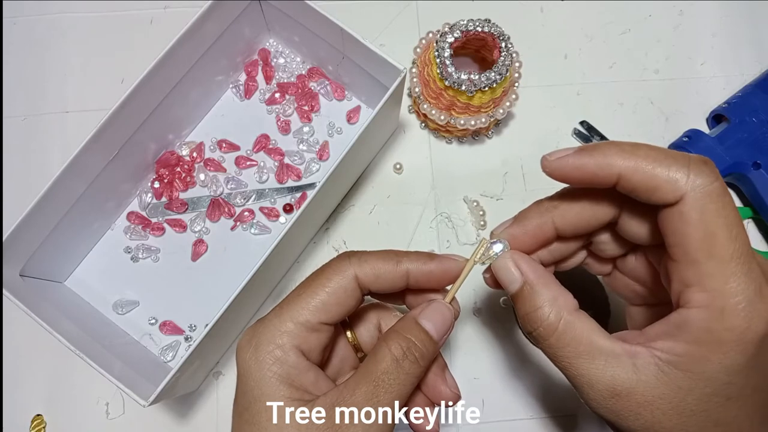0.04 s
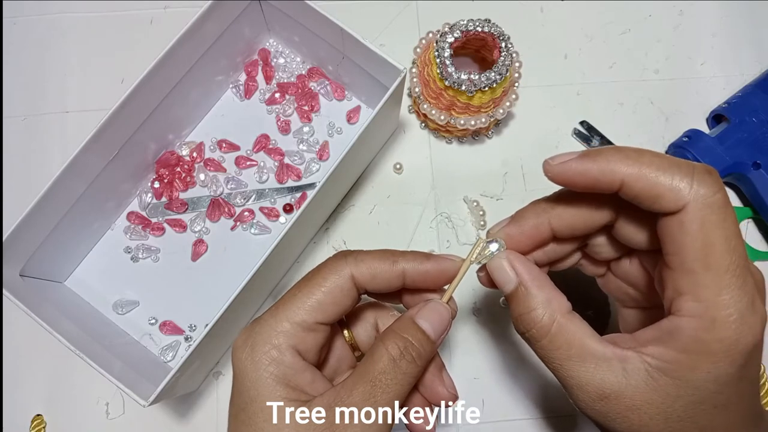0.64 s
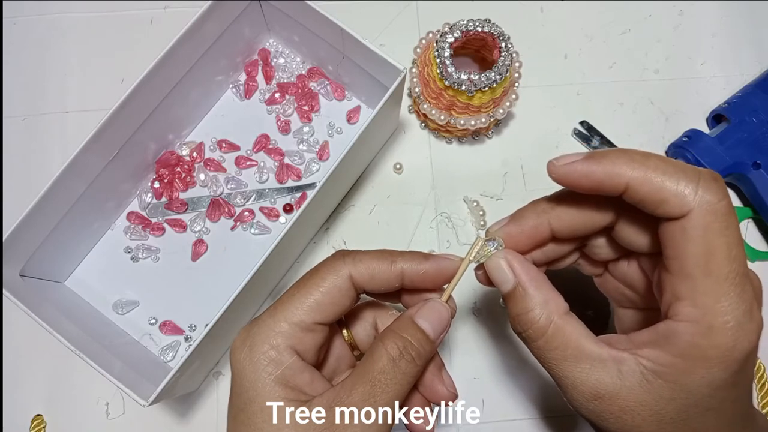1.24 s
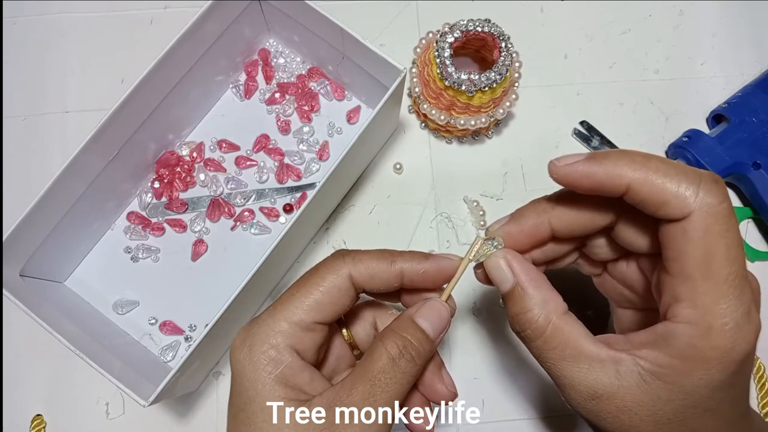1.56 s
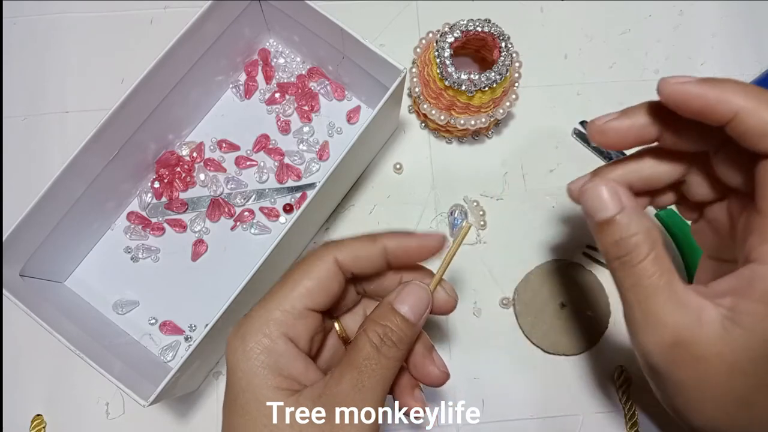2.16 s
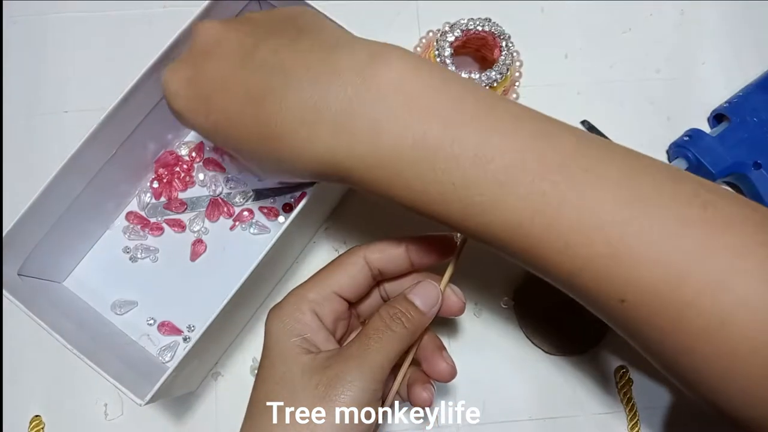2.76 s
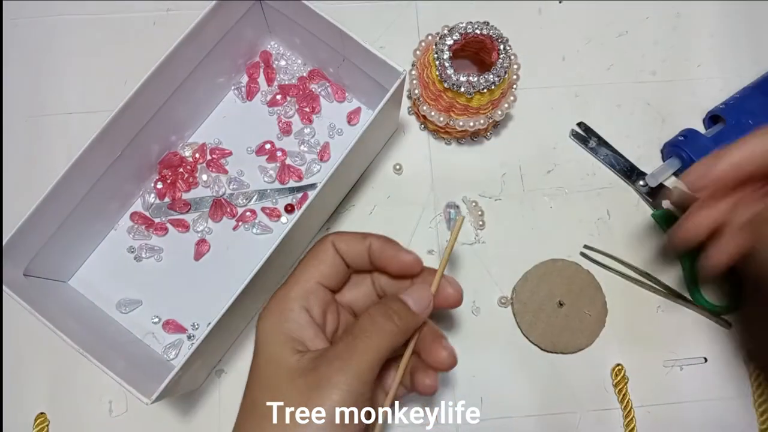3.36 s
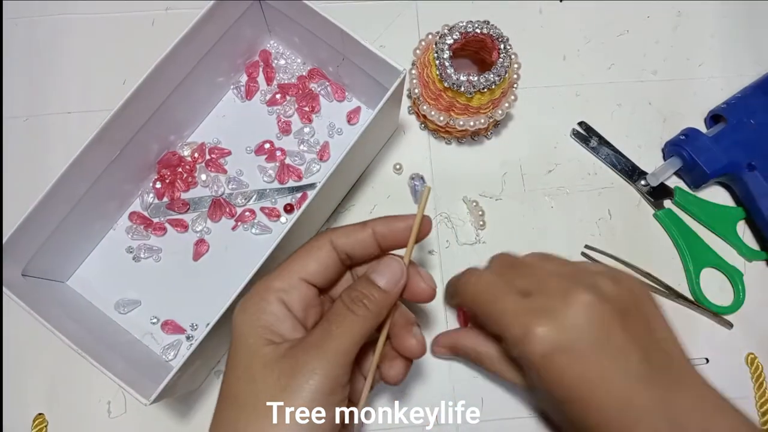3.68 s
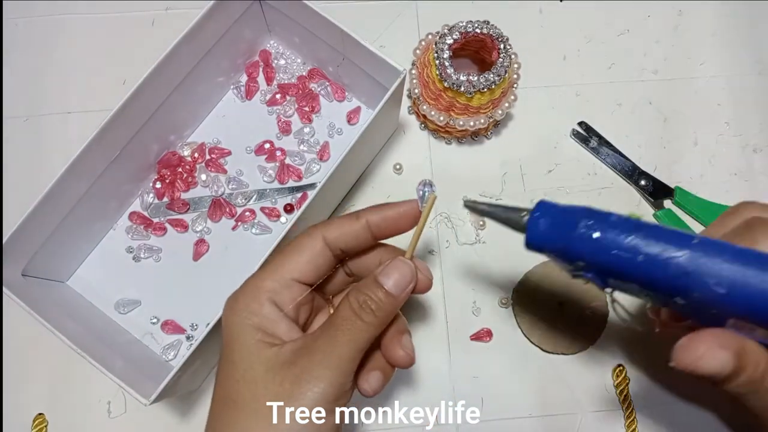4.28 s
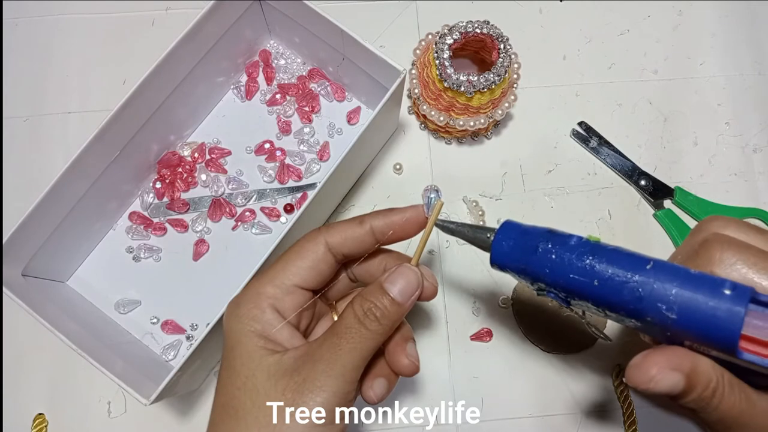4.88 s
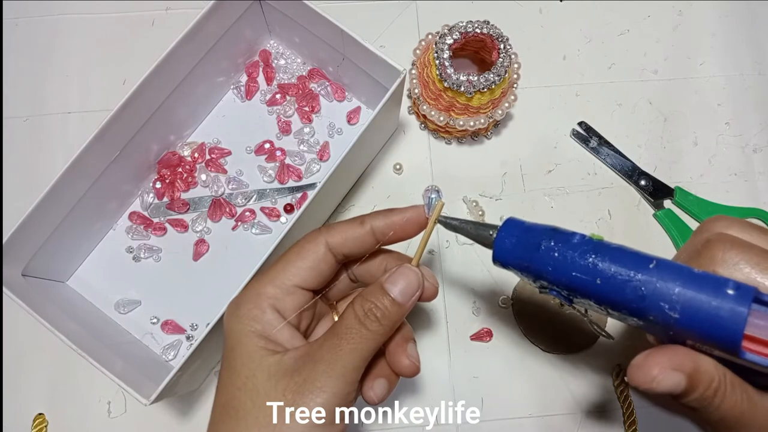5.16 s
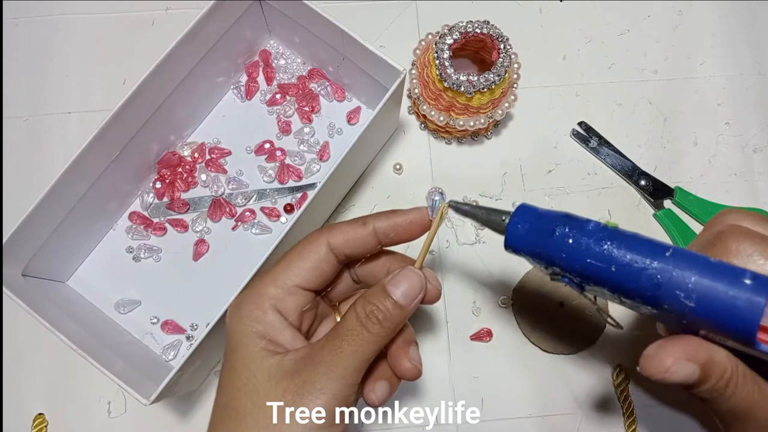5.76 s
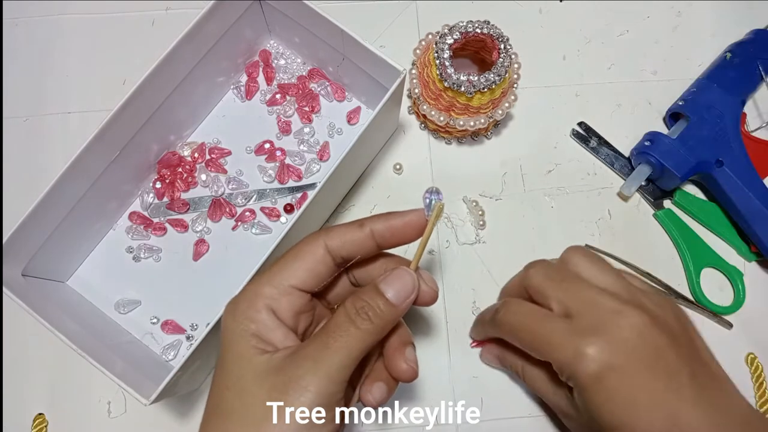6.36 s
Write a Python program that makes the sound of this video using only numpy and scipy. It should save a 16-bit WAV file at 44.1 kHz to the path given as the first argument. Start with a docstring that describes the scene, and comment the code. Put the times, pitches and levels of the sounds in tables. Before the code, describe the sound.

Over a steady low room hum, soft finger friction and small ticks of beads and tools are heard up close. Low puffs of air hit the microphone through the middle, with a couple of pops. A glue gun is squeezed in a run of light clicks and tiny rasps, then lands on its stand with a sharp plastic knock near the end.

```python
"""Fingers fiddle with beads and tools on a table, close to a small microphone in a quiet, humming room.
Taps and sliding friction ring the small objects. A draught buffets the microphone port in low puffs.
A glue gun is picked up: trigger clicks and rasps of the feed ring its housing.
It is set down with a plastic knock, the hollow shell rattling on its stand."""
import sys
import numpy as np
from scipy import signal
from scipy.fft import rfft, irfft
from scipy.io import wavfile

SR = 44100
rng = np.random.default_rng(int(sys.argv[2]) if len(sys.argv) > 2 else 0)


def unload_audio(sound):
    """Save the sound as a 16-bit wav file, at the path given as the first command line argument."""
    columns = np.transpose(np.atleast_2d(sound))
    # keep every value between -1 and 1, then stretch to whole-number steps
    steps = np.round(np.clip(columns, -1, 1) * 32767)
    wavfile.write(sys.argv[1], SR, steps.astype(np.int16))


N = 283122

# Room decay. Each row: frequency in Hz, t60 in seconds.
ROOM_T60 = [(200, 0.36), (2500, 0.1), (8000, 0.22), (15000, 0.062)]
# Spectra of the noise beds and contacts. Each row: frequency in Hz, relative density in dB.
AIR_SPECTRUM = [(15, -58.5), (25, -32), (64, -16.5), (85, -5), (108, -2.5), (194, -4.5), (224, -10.5),
                (277, -12), (444, -14), (1110, -22.5), (1340, -27), (3530, -30), (7000, -62.5), (9100, -80),
                (15400, -120)]
HISS_SPECTRUM = [(1000, -14.5), (4500, -5), (6500, -7), (8200, -10.5), (9700, -1.5), (11000, -14.5),
                 (12500, -9), (15000, -20), (16000, -46.5)]
SKIN_SPECTRUM = [(40, -26.5), (300, -12.5), (1400, -9), (2300, 6), (3800, -1), (5000, -11), (6500, -16),
                 (8200, -12.5), (9700, -3), (11500, -14), (12600, -18.5), (16000, -26)]
TAP_SPECTRUM = [(40, -31), (200, -10), (700, -8), (1400, -16), (2000, -2.5), (2700, -1.5), (3400, -1.5),
                (4200, -11.5), (5200, -17), (7500, -25.5), (9700, -15), (12500, -32.5), (16000, -28)]
RUB_SPECTRUM = [(40, -35), (300, 7), (1400, -3), (2200, 4.5), (2900, 5), (3900, 1), (5000, -10),
                (6500, -18.5), (8200, -16), (9800, -9), (12500, -26.5), (16000, -24)]
HOUSING_SPECTRUM = [(40, -36), (300, -3), (1500, -12), (2400, 3), (3000, -2.5), (3800, 4.5), (5200, -14.5),
                    (6600, -12.5), (7600, -19), (9800, -4), (11800, -15.5), (12600, -20), (14200, -14.5),
                    (16000, -23)]
CRACK_SPECTRUM = [(50, -21), (400, 5), (1500, -4), (3200, 0), (4500, -1), (6300, -12), (9300, -2.5),
                  (12500, -22), (14500, -13), (16000, -33)]
# Constant soft sliding of skin. Each row: time in seconds, relative level in dB.
SKIN_LEVELS = [(0, -65), (.4, -66.5), (.6, -65.5), (.85, -63), (1.0, -69), (1.3, -66), (1.7, -70.5),
               (2.1, -70), (2.3, -68), (2.7, -65.5), (2.95, -70.5), (3.55, -69), (3.85, -65), (4.35, -63),
               (4.6, -65.5), (5.05, -69), (5.6, -66), (6.42, -69)]
# Dull bumps and scuffs. Each row: time in seconds, level in dB, length in seconds, centre and width in Hz.
DULL_BUMPS = [(0.123, -41, 0.027, 154, 111), (0.132, -47, 0.04, 617, 553), (0.283, -51, 0.016, 1050, 240),
              (0.429, -48.5, 0.063, 620, 260), (0.687, -51, 0.016, 720, 706), (2.326, -50, 0.081, 564, 150),
              (5.194, -47, 0.0047, 1710, 1400), (5.67, -56, 0.019, 1110, 160)]
# Beads and tools touching. Each row: start in seconds, body level in dB, resonance in Hz.
BEAD_TAPS = [(0.2406, -49.5, 2580), (2.2679, -47, 2870), (2.5505, -46, 2600), (2.9153, -46.5, 2110),
             (2.9503, -43.5, 2560), (3.0457, -54.5, 2060), (3.238, -49, 2350), (3.7828, -47.5, 3510),
             (3.834, -36.5, 3900), (4.0115, -47.5, 2270), (4.0769, -36, 2640), (4.091, -45.5, 3480),
             (4.3051, -54.5, 1860), (6.2226, -40, 2460)]
# Finger strokes. Each row: centre in seconds, relative level in dB, length in seconds, resonance in Hz.
FINGER_RUBS = [(0.248, -50, 0.013, 2640), (0.347, -70, .007, 3670), (0.424, -57, 0.05, 2290),
               (0.514, -58.5, 0.039, 2660), (0.577, -58, 0.039, 2350), (0.644, -52, .016, 3500),
               (0.686, -57, .03, 2480), (0.777, -51, 0.019, 3470), (0.842, -56, 0.021, 3810),
               (0.944, -56, 0.013, 2720), (1.067, -67, 0.014, 2490), (1.255, -58, 0.031, 2570),
               (1.44, -66, 0.018, 3160), (1.615, -54.5, .02, 3440), (1.781, -57.5, 0.022, 3700),
               (1.846, -58.5, 0.03, 2280), (2.008, -61, 0.018, 3770), (2.234, -57, .022, 2300),
               (2.276, -47, 0.023, 2650), (2.556, -44, .017, 2480), (2.685, -70, 0.01, 3660),
               (2.88, -58.5, .15, 2200), (2.961, -57.5, 0.038, 2500), (3.41, -55.5, 0.011, 3150),
               (3.612, -57.5, .025, 3570), (3.845, -53, 0.038, 3870), (4.012, -47.5, 0.013, 2900),
               (4.079, -57, .017, 2700), (4.334, -57.5, 0.013, 3980), (4.464, -61, .05, 3900),
               (5.026, -48, 0.031, 2800), (5.817, -46, 0.015, 2750), (6.157, -51, 0.023, 3070),
               (6.236, -42, .025, 2480), (6.41, -51, 0.015, 3470)]
# Wind strength, one curve per gust. Each row of a curve: time in seconds, relative level in dB.
GUST_CURVES = [
    [(2.19, -62), (2.212, -31.5), (2.228, -18), (2.256, -27.5), (2.28, -18), (2.358, -40), (2.386, -24.5),
     (2.406, -34.5), (2.484, -23.5), (2.512, -31), (2.556, -51), (2.58, -48)],
    [(2.72, -43.5), (2.77, -17.5), (2.782, -18.5), (2.796, -30), (2.832, -27), (2.862, -14.5), (2.894, -23),
     (2.922, -16), (2.948, -31), (2.97, -16.5), (2.992, -19.5), (3.03, -53)],
    [(3.03, -44), (3.062, -33), (3.076, -36), (3.09, -48)],
    [(3.09, -47), (3.128, -29), (3.174, -15), (3.216, -24), (3.244, -14.5), (3.266, -26), (3.298, -18.5),
     (3.346, -48), (3.35, -39)],
    [(3.35, -38), (3.378, -21.5), (3.394, -17), (3.41, -19), (3.434, -43.5), (3.464, -34), (3.492, -55),
     (3.5, -64)],
    [(3.89, -58), (3.906, -32), (3.928, -26.5), (3.988, -30.5), (4.0, -33), (4.02, -64)],
    [(4.45, -68), (4.462, -42.5), (4.478, -20.5), (4.494, -21.5), (4.55, -62)],
    [(4.6, -52), (4.614, -47), (4.684, -33.5), (4.736, -64), (4.754, -40.5), (4.802, -28), (4.856, -46),
     (4.87, -57)],
    [(4.97, -64), (4.98, -48), (4.996, -22.5), (5.01, -25.5), (5.098, -42), (5.12, -47)],
]
# Upper edge of the rumble in Hz at the reference strength, one per gust.
GUST_EDGES_HZ = [199, 233, 200, 220, 138, 135, 215, 145, 155]
# Eddies hitting the port squarely. Each row: centre in seconds, gain in dB, half-width in seconds.
PORT_POPS = [(2.92, -12.5, 0.0013), (3.2397, -10, 0.0013)]
# Trigger clicks. Each row: start in seconds, relative level in dB, treble against body in dB.
TRIGGER_CLICKS = [(4.7028, -52.5, 3), (4.9006, -48, 0.5), (4.9558, -53, 2), (5.0054, -44, -5),
                  (5.0837, -50, 1), (5.1076, -50, 2), (5.1486, -49, 3), (5.2423, -46, 5),
                  (5.3761, -47.5, 5.5), (5.9627, -47.5, 3.5), (5.9985, -42.5, 2), (6.068, -48.5, -7.5)]
# Glue stick slipping in the feed. Each row: centre in seconds, body level in dB.
FEED_SLIPS = [(4.771, -58), (4.856, -60.5), (5.024, -56), (5.212, -54.5), (5.325, -67.5), (5.39, -55),
              (5.449, -53), (5.61, -62.5), (5.971, -49)]
# Modes of the gun's shell. Each row: frequency in Hz, relative level in dB, t60 in seconds.
SHELL_MODES = [(370, -24, 0.024), (696, -22.5, 0.028), (912, -27.5, 0.025), (1473, -26.5, 0.024),
               (2430, -19.5, 0.036), (2510, 4.5, 0.0078), (2660, -22, 0.027), (3085, 3.5, 0.005),
               (3230, -17, 0.015), (3370, -26.5, .03), (3830, -16, 0.013), (5500, -35.5, 0.027)]
# Gun landing and rattling on its stand. Each row: start in seconds, ring level in dB, crack level in dB.
STAND_HITS = [(6.2355, -26, -34.5), (6.2368, -16, -33), (6.2417, -41, -44), (6.2461, -34.5, -44.5),
              (6.2519, -32, -47), (6.2552, -38, -51)]


def amp(db):
    """Decibels to gain."""
    return 10 ** (np.asarray(db) / 20)


def unit_rms(x):
    """Scales to an rms of one."""
    return x / np.sqrt(np.mean(x ** 2) + 1e-20)


def with_energy(x, db, length_s):
    """Gives x the energy of a sound of this level and length."""
    return x * amp(db) * np.sqrt(length_s * SR / (np.sum(x ** 2) + 1e-20))


def lookup(table, hz):
    """Interpolates a table over log frequency."""
    table_hz, values = np.transpose(table)
    return np.interp(np.log(hz + 1), np.log(table_hz + 1), values)


def add(mix, start_s, sound):
    """Mixes a sound in at start_s."""
    start = round(start_s * SR)
    sound = sound[max(-start, 0):]
    part = mix[max(start, 0):][:len(sound)]
    part += sound[:len(part)]


def coloured(x, spectrum):
    """Minimum-phase filter with the given spectrum."""
    hz = abs(np.fft.fftfreq(len(x), 1 / SR))
    log_gain = np.log(amp(lookup(spectrum, hz)))
    response = np.exp(np.conj(signal.hilbert(log_gain)))
    return np.fft.ifft(np.fft.fft(x) * response).real


def wander(rate_hz):
    """Low-passed random drift, unit rms."""
    lowpass = signal.butter(2, rate_hz, fs=SR, output="sos")
    return unit_rms(signal.sosfilt(lowpass, rng.standard_normal(N)))


def swell(length_s, size=16384):
    """Bell envelope, length_s wide at half height, and the seconds to its peak."""
    t = (np.arange(size) - size // 2) / SR
    return 1 / np.cosh(2 * np.arccosh(2) * t / length_s), -t[0]


def snap(decay_s, scatter, size=4096):
    """Impact force: an impulse, then a short burst of noise."""
    force = scatter * rng.standard_normal(size) * np.exp(-np.arange(size) / SR / decay_s)
    force[0] += 1
    return force


def friction(length_s, grain_db, size):
    """Sliding force: tiny uneven slips under one swell, and the seconds to its peak."""
    envelope, lead_s = swell(length_s, size)
    slips = rng.standard_normal(size) * amp(grain_db * np.minimum(rng.exponential(1, size), 3))
    return envelope * slips, lead_s


def resonate(force, centre_hz, boost, width_hz=480):
    """Lifts one broad resonance of the touched object."""
    b, a = signal.iirpeak(centre_hz, centre_hz / width_hz, fs=SR)
    return force + boost * signal.lfilter(b, a, force)


def contact(force, spectrum, db, treble_db, length_s, split_hz=5500):
    """A force rings a small object; treble_db sets the top band against the body."""
    ring = coloured(force, spectrum)
    body = signal.sosfilt(signal.butter(4, split_hz, "low", fs=SR, output="sos"), ring)
    treble = signal.sosfilt(signal.butter(4, split_hz, "high", fs=SR, output="sos"), ring)
    return with_energy(body, db, length_s) + with_energy(treble, db + treble_db, length_s)


def room(x, early_db=-14, early_decay_s=0.012, tail_db=-19, size=16384):
    """Adds quick reflections from nearby surfaces and a short tail, longest in the bass."""
    t = np.arange(size) / SR
    early, tail = rng.standard_normal((2, size)) * (rng.random((2, size)) < 0.15) * (t > 0.001)
    early = early * np.exp(-t / early_decay_s)
    hz, frame_s, frames = signal.stft(tail, SR, nperseg=256)
    decay = amp(-60 * frame_s / lookup(ROOM_T60, hz)[:, None])
    tail = signal.istft(frames * decay, SR, nperseg=256)[1][:size]
    echo = amp(early_db) * early / np.linalg.norm(early) + amp(tail_db) * tail / np.linalg.norm(tail)
    return x + signal.fftconvolve(x, echo)[:N]


def background(air_db=-53.5, hiss_db=-80, hum_db=-55.5, hum_hz=99):
    """Room air, thin hiss and a wavering hum."""
    air = amp(air_db) * unit_rms(coloured(rng.standard_normal(N), AIR_SPECTRUM))
    hiss = amp(hiss_db) * unit_rms(coloured(rng.standard_normal(N), HISS_SPECTRUM))
    hum_phase = 2 * np.pi * hum_hz * np.arange(N) / SR + 0.45 * wander(rate_hz=8.7)
    return air + hiss + amp(hum_db) * unit_rms(np.sin(hum_phase))


def skin(gain_db=-3, uneven_db=4.5, clump_db=2):
    """Finger friction swells with pressure and catches in tiny clumps."""
    level_db = np.interp(np.arange(N) / SR, *np.transpose(SKIN_LEVELS)) + gain_db
    level_db += uneven_db * np.clip(wander(rate_hz=21.7), -2, 2)
    catches = rng.standard_normal(N) * amp(clump_db * np.clip(wander(rate_hz=350), -2, 2))
    return amp(level_db) * unit_rms(coloured(catches, SKIN_SPECTRUM))


def stroke(centre_s, db, length_s, hz, treble_db, size=16384):
    """A sliding finger excites an object's resonance. Returns start in seconds and sound."""
    force, lead_s = friction(length_s, grain_db=4.5, size=size)
    force = resonate(force, hz, boost=1.7)
    return centre_s - lead_s, contact(force, RUB_SPECTRUM, db, treble_db, length_s)


def brushes(per_s=9, typical_s=0.012, typical_hz=3000):
    """Faint, random fingertip strokes that follow the level of the sliding skin."""
    out = np.zeros(N)
    for slot, (jitter, firmness, pitch, brightness, stretch) in enumerate(rng.uniform(-1, 1, (96, 5))):
        centre_s = (slot + (1 + jitter) / 2) / per_s
        if centre_s < N / SR:
            db = np.interp(centre_s, *np.transpose(SKIN_LEVELS)) + 0.5 + 4.5 * firmness
            length_s = typical_s * 2 ** stretch
            hz = typical_hz * 2 ** (0.4 * pitch)
            treble_db = -6 + 5.5 * brightness
            add(out, *stroke(centre_s, db, length_s, hz, treble_db, size=4096))
    return out


def bumps():
    """Soft swells of noise, one broad resonance each."""
    out = np.zeros(N)
    for centre_s, db, length_s, centre_hz, width_hz in DULL_BUMPS:
        envelope, lead_s = swell(length_s)
        hz = np.fft.rfftfreq(len(envelope), 1 / SR)
        resonance = 1 / (1 + (2 * (hz - centre_hz) / width_hz) ** 2)
        noise = irfft(rfft(rng.standard_normal(len(envelope))) * resonance)
        add(out, centre_s - lead_s, with_energy(envelope * noise, db, length_s))
    return out


def beads_and_tools(reference_db=-55, reference_s=0.02):
    """Small objects tap and slide between the fingers; light, quick strokes are brightest."""
    out = np.zeros(N)
    for start_s, db, hz in BEAD_TAPS:
        force = resonate(snap(decay_s=0.0023, scatter=0.3), hz, boost=2.5)
        add(out, start_s, contact(force, TAP_SPECTRUM, db, treble_db=-18, length_s=0.0049))
    for centre_s, db, length_s, hz in FINGER_RUBS:
        dulling_db = 0.95 * (db - reference_db) + 6.5 * np.log2(length_s / reference_s)
        add(out, *stroke(centre_s, db - 1, length_s, hz, treble_db=-7.5 - dulling_db))
    return out


def draught(gain_db=-0.7, reference_db=-20, octaves_per_db=0.033, low_cut_hz=84,
            port_hz=410, port_width_hz=130, steadiness=0.62, flutter_db=1.4):
    """Eddies push on the microphone port; stronger wind reaches higher, and the port cuts deep bass."""
    out = np.zeros(N)
    for curve, reference_edge_hz in zip(GUST_CURVES, GUST_EDGES_HZ):
        times_s, levels_db = np.transpose(curve)
        t = np.arange(times_s[0], times_s[-1], 1 / SR)
        hz, frame_s, frames = signal.stft(rng.standard_normal(SR), SR, nperseg=1024)
        hz = hz[:, None]
        strength_db = np.interp(times_s[0] + frame_s, times_s, levels_db) - reference_db
        edge_hz = reference_edge_hz * 2 ** (octaves_per_db * strength_db)
        band = 1 / np.sqrt((1 + (low_cut_hz / (hz + 1)) ** 7) * (1 + (hz / edge_hz) ** 8.24))
        hollow = 1 + 0.46 / (1 + (2 * (hz - port_hz) / port_width_hz) ** 2)
        rumble = signal.istft(frames * band * hollow, SR, nperseg=1024)[1]
        analytic = signal.hilbert(rumble)[:len(t)]
        # Flatten chance swells so the gust curve sets the strength.
        eddies = analytic.real / (abs(analytic) + np.std(analytic) / 2) ** steadiness
        push = amp(np.interp(t, times_s, levels_db) + gain_db) * signal.windows.tukey(len(t), 0.05)
        add(out, times_s[0], unit_rms(eddies) * push)
    return out * amp(flutter_db * np.clip(wander(rate_hz=25), -2, 2))


def wind_pops(flip_s=0.00047, size=2048):
    """Pressure at the port swings quickly from push to pull."""
    out = np.zeros(N)
    t = (np.arange(size) - size // 2) / SR
    for centre_s, db, half_width_s in PORT_POPS:
        swing = -np.tanh(t / flip_s) * np.exp(-(t / half_width_s) ** 2)
        add(out, centre_s + t[0], amp(db) * swing)
    return out


def stick_slip(centre_s, db, length_s=0.02):
    """The glue stick rasps a short way through the feed. Returns start in seconds and sound."""
    force, lead_s = friction(length_s, grain_db=3, size=8192)
    return centre_s - lead_s, contact(force, HOUSING_SPECTRUM, db, treble_db=2.5, length_s=length_s)


def glue_gun(creep_db=-17, creep_lag_s=0.0031):
    """Trigger and feed ring the same housing; the stick creeps a little with each click."""
    out = np.zeros(N)
    for start_s, db, treble_db in TRIGGER_CLICKS:
        force = snap(decay_s=0.0013, scatter=0.5)
        add(out, start_s, contact(force, HOUSING_SPECTRUM, db + 1, treble_db, length_s=0.0052))
        add(out, *stick_slip(start_s + creep_lag_s, db + creep_db))
    for centre_s, db in FEED_SLIPS:
        add(out, *stick_slip(centre_s, db))
    return out


def gun_landing(crack_decay_s=0.0014, rise_s=0.0012, size=8192):
    """The hollow shell cracks and rings briefly at each touch of its stand."""
    out = np.zeros(N)
    t = np.arange(size) / SR
    ring = sum(amp(db - 60 * t / t60_s) * np.sin(2 * np.pi * hz * t) for hz, db, t60_s in SHELL_MODES)
    ring *= 1 - np.exp(-(t / rise_s) ** 2)
    for start_s, ring_db, crack_db in STAND_HITS:
        crack = coloured(rng.standard_normal(size) * np.exp(-t / crack_decay_s), CRACK_SPECTRUM)
        add(out, start_s, with_energy(ring, ring_db, length_s=0.0048))
        add(out, start_s, with_energy(crack, crack_db, length_s=0.0081))
    return out


def scene(knock_wet=0.66):
    """Mono mix: handling and knock ring in the room; skin, brushes, wind and background stay dry."""
    knock = gun_landing()
    knock += knock_wet * (room(knock) - knock)
    handling = room(beads_and_tools() + glue_gun() + bumps())
    return (handling + knock + skin() + draught() + wind_pops() + background() + brushes())[None]


def record(dry, low_cut_hz=45, band_limit_hz=15800):
    """Low cut and band limit."""
    highpass = signal.butter(2, low_cut_hz, "high", fs=SR, output="sos")
    lowpass = signal.firwin(255, band_limit_hz, window=("kaiser", 8), fs=SR)
    return signal.oaconvolve(signal.sosfilt(highpass, dry), lowpass[None], "same")


dry = scene()
out = record(dry)
unload_audio(out)
```